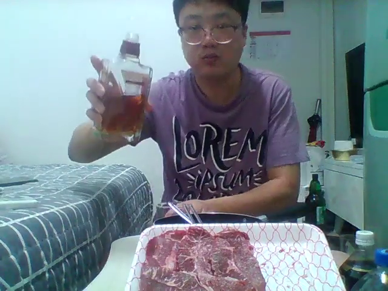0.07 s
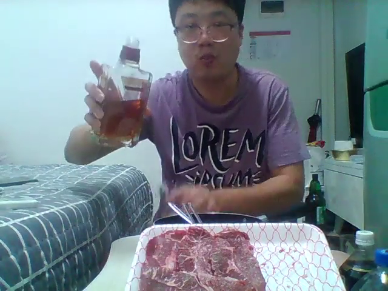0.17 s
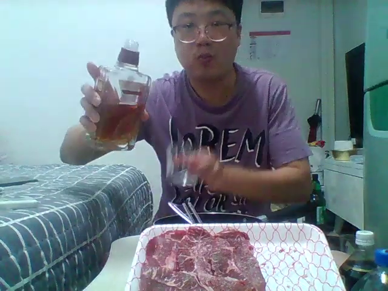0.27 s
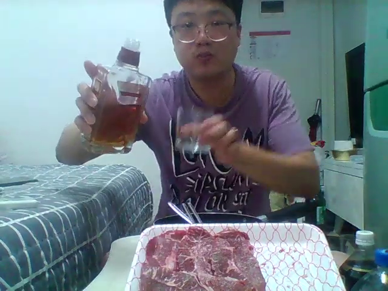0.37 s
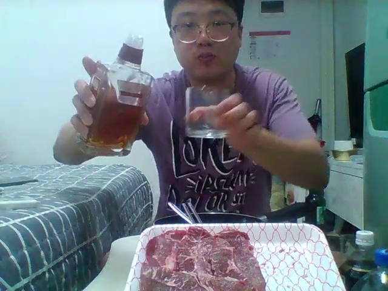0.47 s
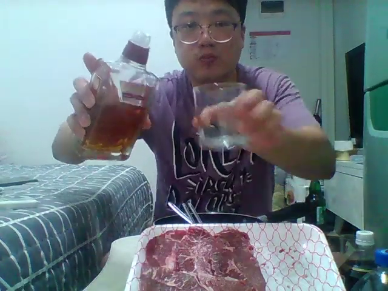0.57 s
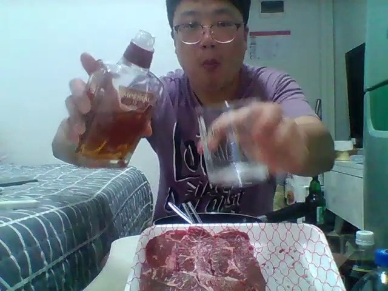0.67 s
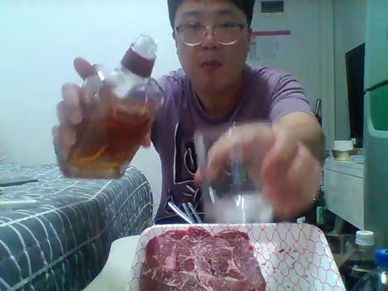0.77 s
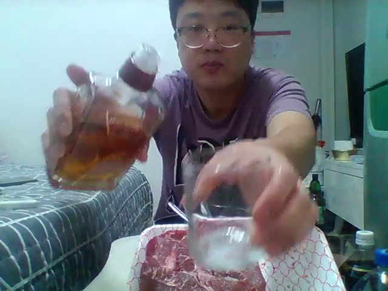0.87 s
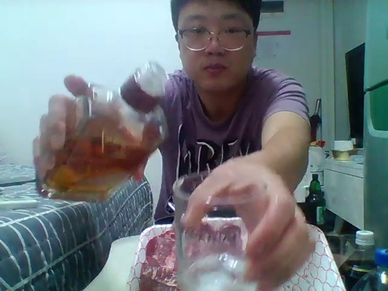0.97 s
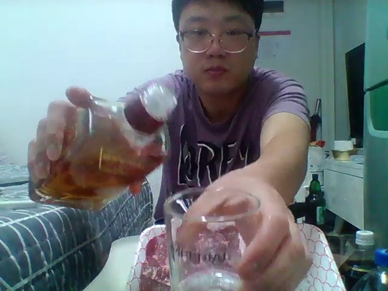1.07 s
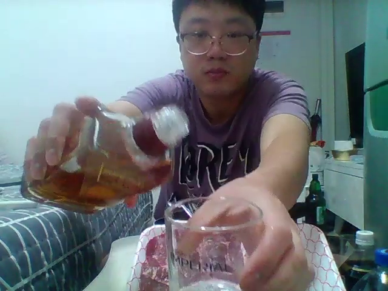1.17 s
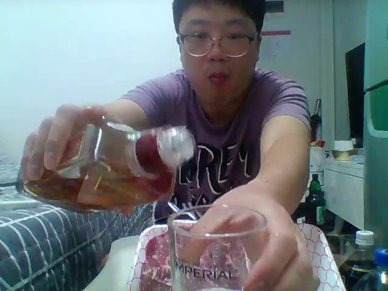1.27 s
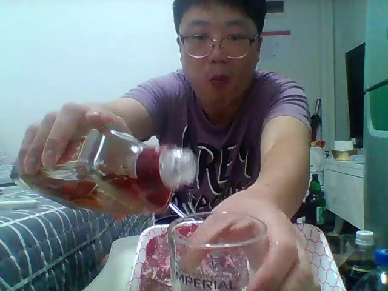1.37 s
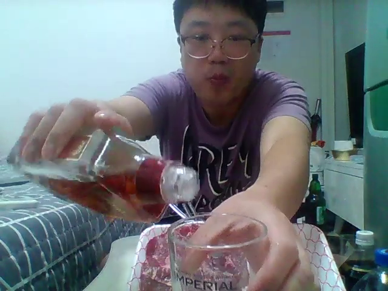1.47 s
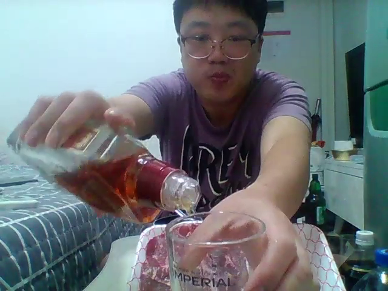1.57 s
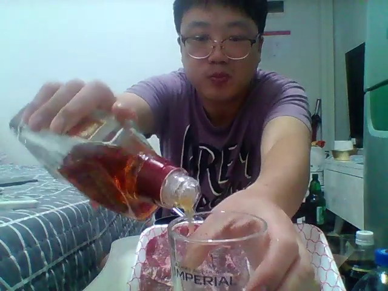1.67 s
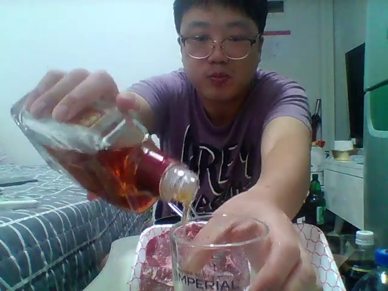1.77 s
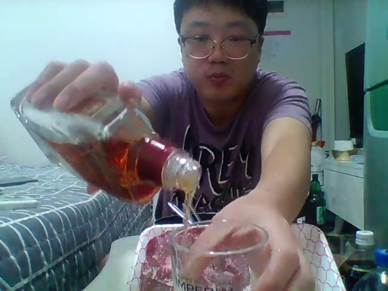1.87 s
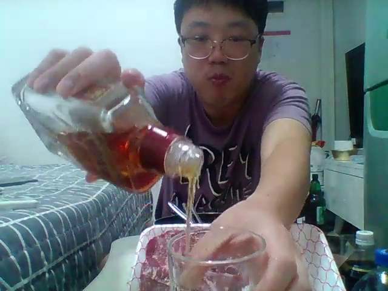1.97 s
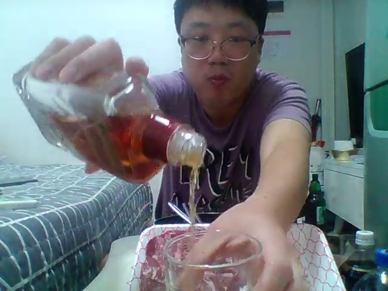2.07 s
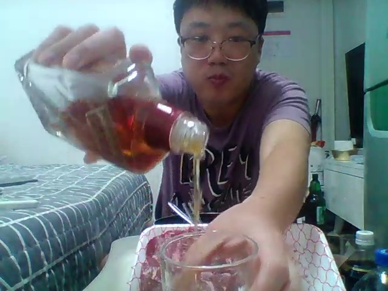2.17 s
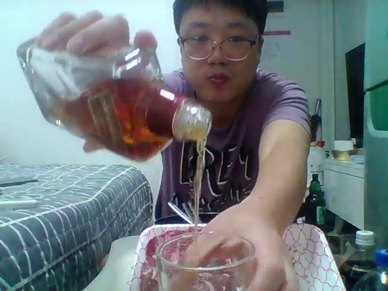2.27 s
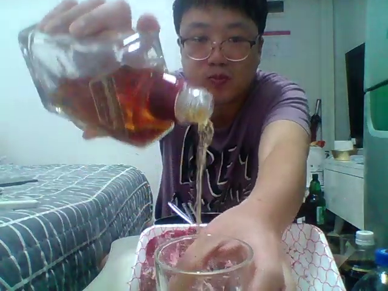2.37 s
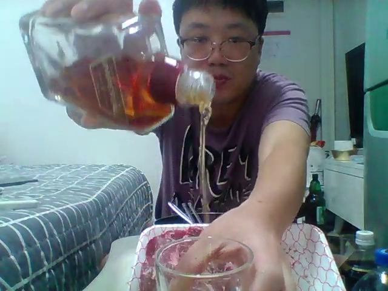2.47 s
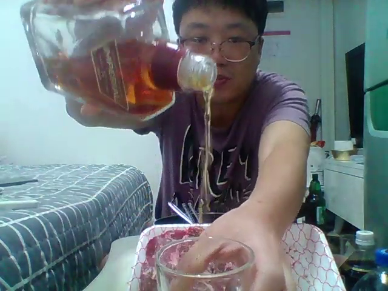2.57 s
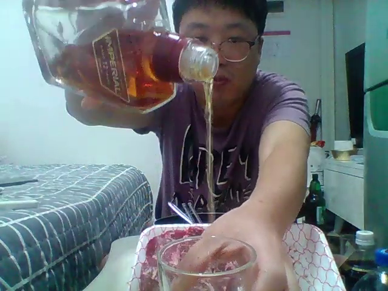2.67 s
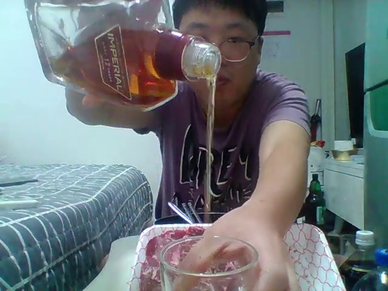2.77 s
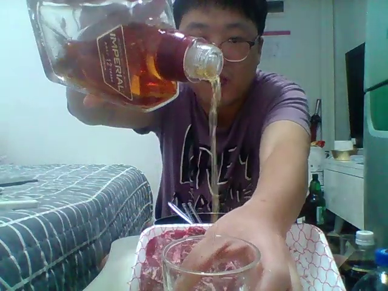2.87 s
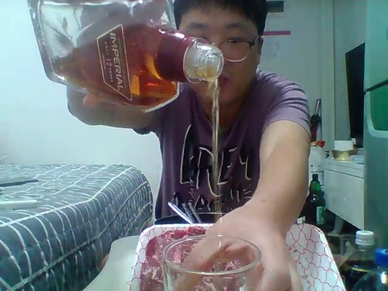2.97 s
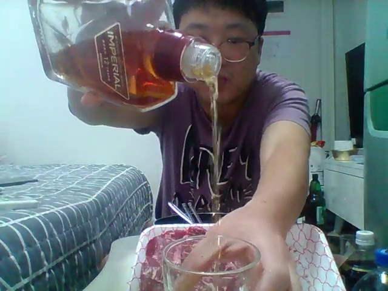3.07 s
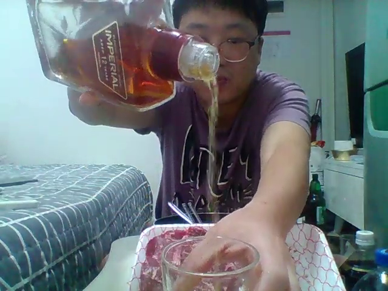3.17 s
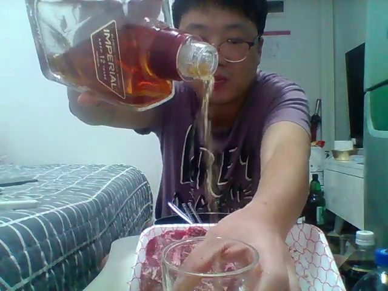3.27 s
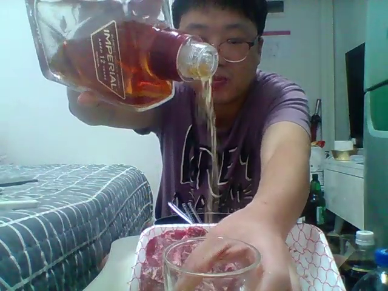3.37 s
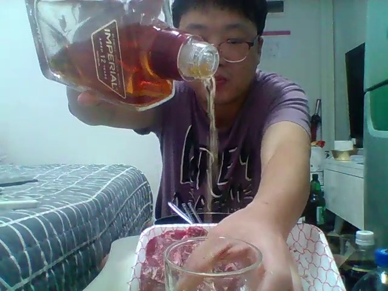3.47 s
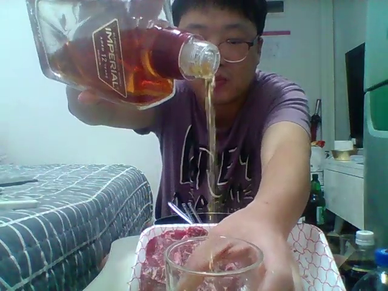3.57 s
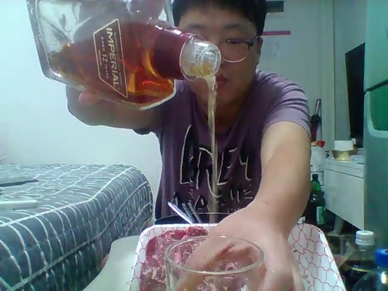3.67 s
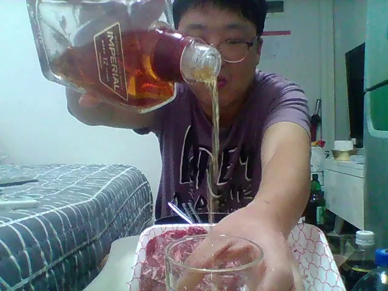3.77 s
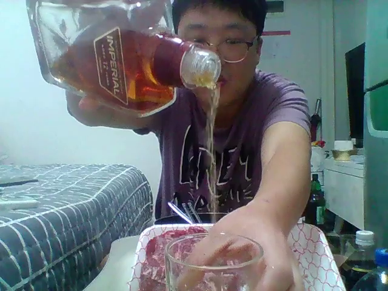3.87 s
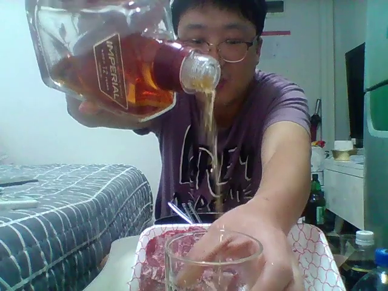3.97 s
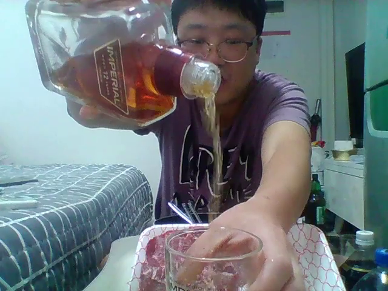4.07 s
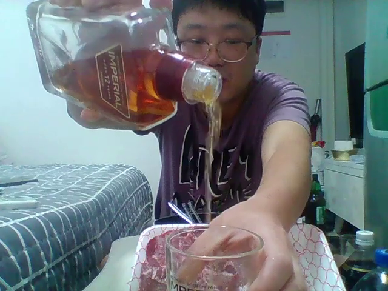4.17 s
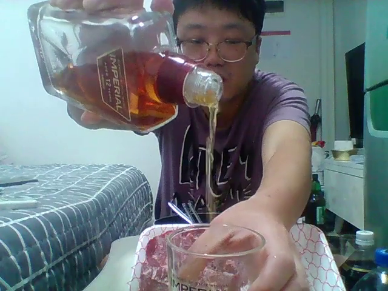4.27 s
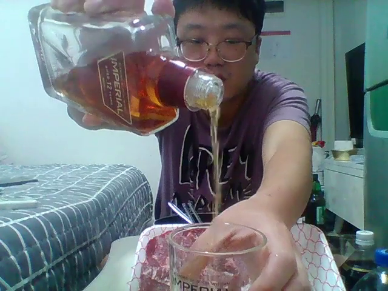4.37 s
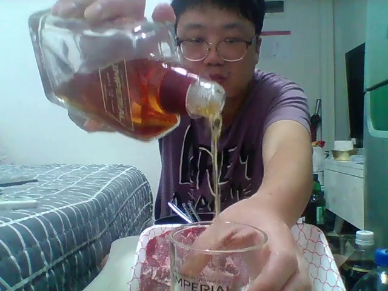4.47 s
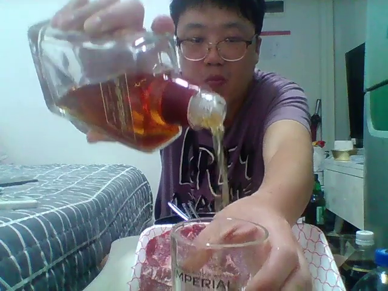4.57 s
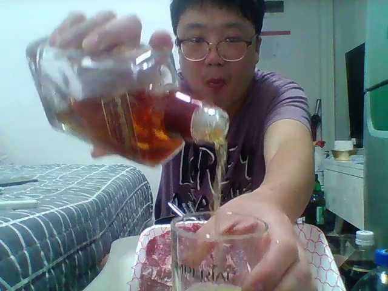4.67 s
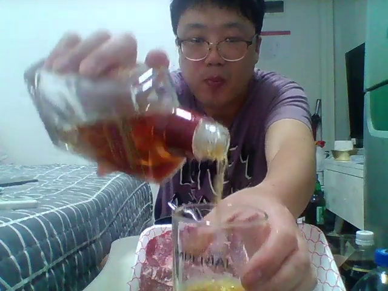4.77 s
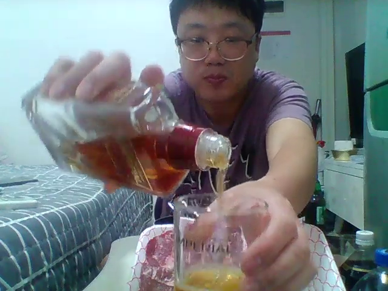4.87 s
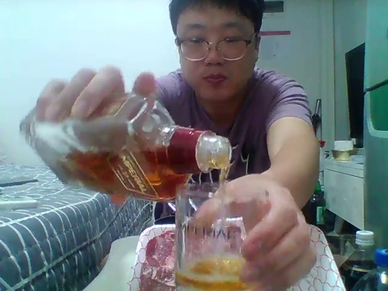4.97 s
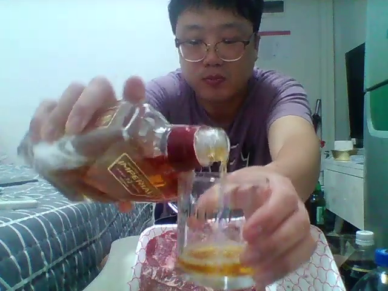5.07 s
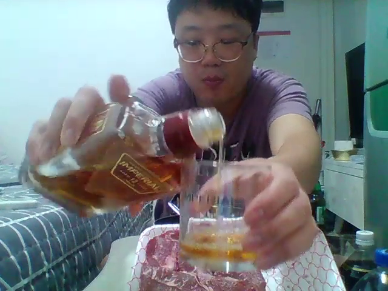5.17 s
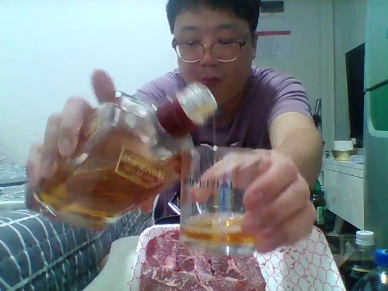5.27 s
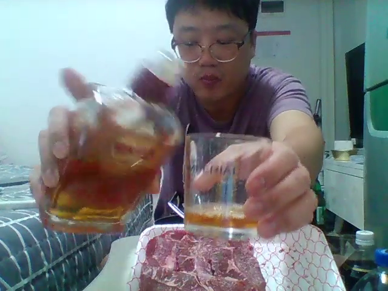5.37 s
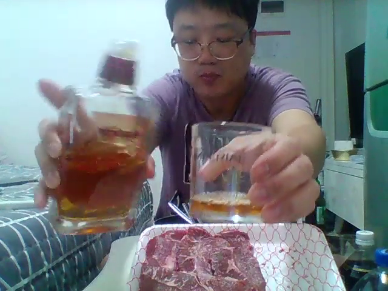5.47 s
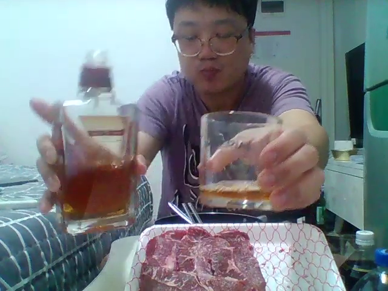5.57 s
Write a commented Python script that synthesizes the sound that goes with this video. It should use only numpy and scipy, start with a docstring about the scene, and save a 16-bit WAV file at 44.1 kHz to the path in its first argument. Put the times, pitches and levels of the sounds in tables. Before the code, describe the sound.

A steady hum and fan rush sit under soft rustles and thuds of glassware being handled. A bottle gulps air in small even blips, sparse at first, then the stream bubbles and patters inside a glass, growing fuller. One loud, short glass knock comes near the end, followed by wet plops and a light handling touch. Close, narrow-band microphone, short room reverberation.

```python
"""Whisky poured into a tumbler

Close up in a small room, whisky runs from a glass bottle into a hand-held tumbler while a computer hums.
Air gulps blip and ring the neck; bubbles, slaps and droplets are chirps and noise ringing the tumbler's air.
At the end the neck clinks on the rim as a set of decaying glass modes, after a few soft touches of handling.
A narrow-band microphone picks it all up and clips the loudest peaks."""
import sys
import numpy as np
from scipy import signal
from scipy.fft import rfft, irfft, next_fast_len
from scipy.io import wavfile
from scipy.ndimage import map_coordinates

SR = 44100
rng = np.random.default_rng(int(sys.argv[2]) if len(sys.argv) > 2 else 0)


def wrap_up_sound(samples):
    """Save the sound to the file named by the first command line argument, as 16-bit audio."""
    columns = np.atleast_2d(samples).T
    # keep every value between -1 and 1, then stretch to whole-number steps
    tamed = np.clip(columns, -1, 1)
    steps = np.round(tamed * 32767).astype(np.int16)
    wavfile.write(sys.argv[1], SR, steps)


N = 248327  # length in samples

# Steady tones of the computer and its fans. Each row: pitch in Hz, base level in dB rms.
HUM_TONES = [(58.5, -56.5), (90.2, -44), (119.2, -49), (327, -58), (368, -64.5), (490, -63), (653, -64.5),
             (818, -56.5), (981, -59)]
# Colour of the fan rush and microphone hiss. Each row: frequency in Hz, relative level in dB per Hz.
AIR_COLOUR = [(20, -0.5), (45, 3), (75, -2), (140, -3), (200, -12.5), (330, -10.5), (600, -11.5),
              (720, -15), (850, -8.5), (1050, -11.5), (1600, -19.5), (3000, -30), (5000, -31.5),
              (6600, -30.5)]
# How long the room rings. Each row: frequency in Hz, time to fall 60 dB in seconds.
ROOM_DECAY = [(150, .25), (1000, 0.24), (3000, 0.29), (7000, 0.2)]
# Hands shift on the glassware, arms brush the desk.
# Each row: start in seconds, rustle level in dB (before a common trim), thud level in dB.
TOUCHES = [(0.0094, -31.5, -38), (0.505, -30.5, -56), (0.694, -25, -29), (0.890, -28.5, -32),
           (1.1316, -24, -49), (1.3437, -35, -54), (5.453, -30, -53), (5.5889, -30.5, -46)]
# Colour of a rustle. Each row: frequency in Hz, relative level in dB.
RUSTLE_COLOUR = [(300, -19.5), (800, 0.5), (1500, 10.5), (2000, -5.5), (3200, -13), (7000, -44.5)]
# Colour of a thud. Each row: frequency in Hz, relative level in dB.
THUD_COLOUR = [(30, -5), (85, 6.5), (180, -1.5), (400, -5.5), (700, -16), (1500, -53)]
# Resonances of the bottle in the hand. Each row: centre in Hz, width in Hz, gain in dB.
BOTTLE_MODES = [(1017, 90, 7.5), (1480, 130, -4), (1930, 80, 10.5), (2880, 90, 7.5), (3850, 100, 13)]
# The neck strikes the rim and chatters.
# Each row: start in seconds, level in dB, extra level of the low body modes in dB against the rim ring.
CONTACTS = [(5.0578, 1.5, 1.5), (5.0952, -10.5, -6), (5.1235, -19, -10)]
# Ringing modes of bottle and tumbler. Each row: pitch in Hz, level in dB, time to fall 60 dB in seconds.
GLASS_MODES = [(902.7, -4.5, 0.084), (955.5, -10, 0.19), (1034, -17.5, 0.11), (1140, -25, 0.18),
               (1268, -28.5, 0.22), (1436, -25, 0.25), (1722, -25, .12), (2195, -2, 0.11),
               (2143, -27.5, 0.14), (2115, -34, 0.59), (2414, -22.5, 0.068), (3175, -26, 0.086),
               (4510, -38, 0.09), (5302, -33.5, 0.089), (5160, -34.5, 0.065), (6530, -34, 0.034)]
# Air resonances of the tumbler. Each row: centre in Hz, width in Hz, gain in dB.
CAVITY_MODES = [(963, 21, -3), (1364, 130, -2.5), (1690, 130, -13), (2090, 37, -6.5), (3080, 21, -15.5),
                (3362, 61, 0), (3800, 84, -9.5), (4565, 290, -3), (5400, 75, -4.5), (6080, 290, -4.5)]
# The loudest droplets that slap the glass.
# Each row: start in seconds, level in dB (before the trims of tick and ping), ping pitch in Hz.
DROPLETS = [(2.7324, -33.5, 3600), (3.104, -33, 2730), (3.1198, -32, 3280), (3.235, -35.5, 4440),
            (3.261, -38, 3270), (3.3014, -33.5, 3340), (3.3858, -37.5, 3290), (3.4341, -38, 3350),
            (3.482, -34, 3440), (3.6347, -36, 3190), (3.716, -37.5, 3320), (3.8402, -35.5, 3410),
            (3.8534, -24, 3570), (3.8916, -34, 3800), (3.918, -29, 3460), (3.9293, -28.5, 2980),
            (4, -33.5, 3260), (4.054, -22, 5730), (4.11, -36, 3430), (4.211, -39, 4540), (4.622, -34, 3470),
            (4.6754, -37, 3450), (4.89, -35, 3410)]
# Gushes that splash up in the glass. Each row: middle in seconds, level in dB.
GUSH_PEAKS = [(3.118, -45), (3.609, -45), (3.748, -48.5), (3.995, -43.5), (4.385, -45.5), (4.679, -45.5)]
# The stream in the glass as it swells and thins. Each row: time in seconds, churn level in dB, spray level in dB.
STREAM_LEVELS = [(2.8, -72.5, -70.5), (3.05, -56.5, -64.5), (3.3, -67, -63), (3.44, -58.5, -60.5),
                 (3.82, -51, -65.5), (4.06, -50, -57), (4.19, -63.5, -56), (4.35, -46, -65.5),
                 (4.84, -50.5, -62.5), (5.03, -51, -70.5), (5.23, -52, -71), (5.3, -63, -70)]
# The largest bubbles trapped by the stream.
# Each row: start in seconds, level in dB (before the mix of direct and tumbler sound), starting pitch in Hz,
# life in seconds.
BIG_BUBBLES = [(1.9712, -26, 1440, 0.026), (2.349, -31, 980, 0.011), (2.3528, -30, 1364, 0.015),
               (3.2925, -27.5, 1383, 0.027), (3.5909, -29, 1770, 0.015), (3.599, -24.5, 1380, 0.0097),
               (3.6948, -27, 1377, 0.015), (3.78, -31, 1314, 0.013), (3.853, -26, 945, 0.028),
               (3.894, -27, 1387, 0.025), (4.3046, -20.5, 1338, 0.021), (4.3598, -21.5, 1520, 0.011),
               (4.3989, -23, 1365, 0.014), (4.4358, -28.5, 1380, .018), (4.4992, -27.5, 990, 0.017),
               (4.509, -24, 1039, .022), (4.5494, -24, 957, .046), (4.5717, -29, 1370, 0.014),
               (4.5991, -29, 1043, 0.0345), (4.7002, -36, 1350, 0.023), (4.748, -34.5, 970, .04),
               (4.807, -30.5, 1505, 0.014), (4.8655, -32.5, 1316, 0.022), (4.8894, -27, 1360, 0.011),
               (4.9086, -32, 1360, 0.02), (4.9338, -28.5, 1270, 0.015), (5.0073, -33, 864, 0.035),
               (5.0223, -23, 934, .052), (5.1213, -14.5, 942, 0.019), (5.1242, -18.5, 1350, 0.014),
               (5.1444, -17.5, 980, 0.014), (5.1797, -23, 1007, 0.021), (5.1902, -27, 1380, 0.015),
               (5.2097, -18, 1052, 0.025), (5.2695, -27.5, 1366, 0.022)]
# Runs of air gulps in the bottle neck.
# Each row: start in seconds, number of gulps, blip peak of the first in dB, change from gulp to gulp in dB.
GULP_RUNS = [(1.4803, 5, -41, 2), (1.8287, 1, -43.5, 5), (1.8856, 2, -42, -1), (2.066, 3, -36, -2),
             (2.4514, 1, -31, 0), (2.5225, 6, -43.5, 0.5), (3.0929, 1, -32.5, -3), (3.2608, 1, -36.5, 0),
             (3.3887, 2, -33, -5), (3.7418, 1, -26.5, 0), (3.9739, 1, -32, 0), (4.1864, 2, -34, -9),
             (4.3635, 1, -27.5, 2.5), (4.5723, 1, -30.5, 0)]

# the low hum sinks for a while and returns
HUM_DIP_S, HUM_DIP_WIDTH_S, HUM_DIP_DB, HUM_LOW_DB = 3.04, 1.47, -6.5, 3
# a low rumble while the bottle is tipped
RUMBLE_START_S, RUMBLE_END_S, RUMBLE_FADE_S, RUMBLE_DB = 1.8, 3.88, .2, -54
GUSH_S = .05  # length of a gush
BUBBLE_RISE = 0.13  # share by which a big bubble's pitch climbs in one life
GULP_S = .0707  # the bottle takes in air at its own even pace
TOP_HZ = 15940  # nothing passes above this


def amp(db):
    """Decibels to gain."""
    return 10 ** (np.asarray(db) / 20)


def unit(x):
    """Scale to rms 1."""
    return x / np.sqrt(np.mean(x ** 2) + 1e-20)


def along(points, hz):
    """Read (Hz, value) points on a log frequency axis."""
    f, v = np.transpose(points)
    return np.interp(np.log(hz + 1), np.log(f + 1), v)


def clock(seconds):
    """Sample times of a stretch."""
    return np.arange(int(seconds * SR)) / SR


def add(track, s, sound):
    """Mix a sound into the track at time s."""
    part = track[max(round(s * SR), 0):][:len(sound)]
    part += sound[:len(part)]


def wobble(rate):
    """A smooth random curve, rate knots a second."""
    knots = rng.standard_normal(int(N * rate / SR) + 4)
    return map_coordinates(knots, [np.arange(N) * rate / SR])


def filtered(x, response):
    """Shape x by a complex response of frequency."""
    m = next_fast_len(len(x) + SR // 4)
    spectrum = rfft(x, m) * response(np.fft.rfftfreq(m, 1 / SR))
    return irfft(spectrum, m)[:len(x)]


def noise(colour, size=N):
    """Noise of rms 1 with the given colour."""
    return unit(filtered(rng.standard_normal(size), lambda hz: amp(along(colour, hz))))


def resonate(x, modes):
    """Let x ring a body, each mode a band-pass resonance (centre Hz, width Hz, dB)."""
    def response(f):
        return sum(amp(db) * 1j * f * w / (c * c - f * f + 1j * f * w) for c, w, db in modes)
    return filtered(x, response)


def tumbler(x):
    """The air in the tumbler rings at its own resonances."""
    return resonate(x, CAVITY_MODES)


def bubble(hz, life, rise, onset=5, fade_db=40):
    """A pocket of air rings, peak about 1; its pitch climbs as it nears the surface."""
    t = clock(2 * life)
    swell = (1 - np.exp(-onset * t / life)) * amp(-fade_db * t / life)
    chirp = np.sin(2 * np.pi * hz * t * (1 + rise * t / life / 2))
    return swell / swell.max() * chirp


def swarm(count, centre_hz, spread, cycles, scatter_db, direct):
    """Many small bubbles of random pitch, size and life, heard direct and in the tumbler; pour rms about 1."""
    out, start, end = np.zeros(N), STREAM_LEVELS[0][0], STREAM_LEVELS[-1][0]
    times = start + (end - start) * (np.arange(count) + 2 * rng.random(count)) / count
    for s, (pitch, size, life) in zip(times, np.clip(rng.standard_normal((count, 3)), -2, 2)):
        hz = centre_hz * np.exp(spread * pitch)
        add(out, s, amp(scatter_db * size) * bubble(hz, cycles * np.exp(.5 * life) / hz, 0.036))
    return unit(direct * out + tumbler(out)) * np.sqrt((end - start) * SR / N)


def computer(air_db=-46, waver_db=0.66, drift=0.13, low_hz=100):
    """Tones wavering in level and phase over fan rush and microphone hiss."""
    t = np.arange(N) / SR
    low_swell = HUM_LOW_DB + HUM_DIP_DB * np.exp(-((t - HUM_DIP_S) / HUM_DIP_WIDTH_S) ** 2)
    tones = np.zeros(N)
    for hz, db in HUM_TONES:
        phase = 2 * np.pi * (hz * t + rng.random())
        phase += drift * np.sqrt(hz / HUM_TONES[0][0]) * wobble(5)
        tones += amp(db + low_swell * (hz < low_hz) + waver_db * wobble(2)) * np.sin(phase)
    return np.sqrt(2) * tones + amp(air_db) * noise(AIR_COLOUR)  # sqrt(2) turns peak into rms


def wall(x, delay=.0165):
    """One early echo from the nearest wall, delay in seconds."""
    return np.pad(x, (int(delay * SR), 0))[:N]


def room(x, delay=.008):
    """The small room answers with a noise tail; each frequency dies at its own speed."""
    hz, t, z = signal.stft(rng.standard_normal(SR // 2), SR, nperseg=256)
    decay = amp(-60 * t / along(ROOM_DECAY, hz)[:, None])
    tail = signal.istft(z * decay, SR, nperseg=256)[1]
    delayed = np.pad(tail / np.linalg.norm(tail), (int(delay * SR), 0))
    return signal.fftconvolve(x, delayed)[:N]


def handling(rustle_db=-10, rustle_t60=0.047, thud_t60=0.1):
    """Soft touches: a brief rustle that rings the bottle, over a dull thud."""
    rustles, thuds, t = np.zeros(N), np.zeros(N), clock(0.14)
    soft = 1 - np.exp(-t / 0.00094)
    for s, high_db, low_db in TOUCHES:
        rustle = noise(RUSTLE_COLOUR, size=len(t))
        add(rustles, s, soft * amp(high_db + rustle_db - 60 * t / rustle_t60) * rustle)
        thud = noise(THUD_COLOUR, size=len(t))
        add(thuds, s, soft * amp(low_db - 60 * t / thud_t60) * thud)
    return .5 * rustles + resonate(rustles, BOTTLE_MODES) + thuds


def rumble():
    """Low coloured noise fades in as the liquid starts to run, holds and fades out."""
    t = np.arange(N) / SR
    swell = np.clip(np.minimum(t - RUMBLE_START_S, RUMBLE_END_S - t) / RUMBLE_FADE_S, 0, 1)
    colour = [(90, -31.0), (140, 0.5), (185, -1.5), (260, -11.5), (600, -27.5), (1200, -55)]
    return amp(RUMBLE_DB) * swell * noise(colour)


def clink(attack=0.0021, body_top_hz=1900, crack_db=-17, crack_t60=0.088, choke_s=5.15, choke_db=-6):
    """Glass on glass: each contact feeds the same ringing modes and makes a short crack."""
    out, t = np.zeros(N), clock(.55)
    colour = [(100, -14.5), (400, -7.0), (900, 11.5), (1550, 1), (2300, 8.5), (4000, -23.0), (7000, -26.0)]
    for s, db, body_db in CONTACTS:
        since_first = t + s - CONTACTS[0][0]  # keeps each mode in step across the contacts
        for hz, mode_db, t60 in GLASS_MODES:
            level_db = db + mode_db + body_db * (hz < body_top_hz)
            swell = (1 - np.exp(-t / attack)) * amp(level_db - 60 * t / t60)
            add(out, s, swell * np.sin(2 * np.pi * hz * since_first))
        crack = noise(colour, size=len(t))
        add(out, s, amp(db + crack_db - 60 * t / crack_t60) * crack)
    # the neck comes to rest on the rim and damps the ring
    choke = np.clip((np.arange(N) / SR - choke_s) / 0.0091, 0, 1)
    return out * amp(choke_db * choke)


def drops(ping_db=-6, life=0.0096, slap_db=-7, slap_t60=0.014):
    """A droplet makes a wet tick and a tiny ping, both sounding the tumbler."""
    out, t = np.zeros(N), clock(.04)
    colour = [(700, -15.0), (1700, 10.0), (2600, 2.0), (4000, 2.5), (7000, -4.5)]
    for s, db, hz in DROPLETS:
        slap = noise(colour, size=len(t))
        add(out, s, amp(db + slap_db - 60 * t / slap_t60) * slap)
        add(out, s, amp(db + ping_db) * bubble(hz, life, 0.021))
    return .5 * out + tumbler(out)


def gushes():
    """A thicker part of the stream lands: a short, dense burst of small bubbles."""
    t = np.arange(N) / SR
    swell = np.zeros(N)
    for s, db in GUSH_PEAKS:
        swell += amp(db) * np.cos(np.pi * np.clip((t - s) / GUSH_S, -.5, .5)) ** 2
    return swell * swarm(count=1800, centre_hz=2316, spread=0.18, cycles=10, scatter_db=2, direct=0.86)


def stream(gurgle_db=-1, surge_db=4.0):
    """The surging stream churns the liquid, traps gurgling bubbles and throws up a fine spray."""
    def level(s, db):
        return amp(np.interp(np.arange(N) / SR, s, db, left=-120, right=-120))
    s, churn_db, spray_db = np.transpose(STREAM_LEVELS)
    gurgle = swarm(count=260, centre_hz=1217, spread=0.2, cycles=17, scatter_db=2.0, direct=0.9)
    churn = swarm(count=800, centre_hz=1692, spread=0.303, cycles=9.8, scatter_db=6, direct=0.23)
    spray = swarm(count=1000, centre_hz=4310, spread=0.31, cycles=6.5, scatter_db=7.5, direct=.22)
    splash = level(s, churn_db) * (churn + amp(gurgle_db) * gurgle) + level(s, spray_db) * spray
    return splash * amp(surge_db * wobble(35))


def plops(direct_db=-1, cavity_db=-11, slap_db=-8.5, slap_t60=0.065):
    """Each large bubble is born in a wet slap; both sound the tumbler."""
    tones, slaps, t = np.zeros(N), np.zeros(N), clock(0.051)
    colour = [(500, -19.5), (900, 13), (2000, 3.5), (2900, -17.5), (5000, -32)]
    for s, db, hz, life in BIG_BUBBLES:
        add(tones, s, amp(db) * bubble(hz, life, BUBBLE_RISE))
        slap = noise(colour, size=len(t))
        add(slaps, s, amp(db + slap_db - 60 * t / slap_t60) * slap)
    direct = amp(direct_db) * tones + .5 * slaps
    return direct + tumbler(amp(cavity_db) * tones + slaps)


def glugs(blip_hz=1930, life=0.0063, rise=0.17, ring_db=-11, ring_hz=2085, ring_t60=0.12,
          smack_db=-12, smack_t60=0.023):
    """Each gulp of air is a wet smack and a short upward blip that leaves the neck ringing."""
    out, t = np.zeros(N), clock(.15)
    colour = [(400, -19.5), (900, 6.5), (2300, -3), (3200, -21)]
    gulps = []
    for s, count, db, step_db in GULP_RUNS:
        gulps += [(s + k * GULP_S, db + k * step_db) for k in range(round(count))]
    for (s, db), (pitch, phase) in zip(gulps, rng.standard_normal((len(gulps), 2))):
        add(out, s, amp(db) * bubble(blip_hz * np.exp(.025 * pitch), life, rise))
        ring = np.sin(2 * np.pi * ring_hz * np.exp(.006 * pitch) * t + np.pi * phase)
        add(out, s, amp(db + ring_db - 60 * t / ring_t60) * (1 - np.exp(-t / 0.0012)) * ring)
        smack = noise(colour, size=len(t))
        add(out, s, amp(db + smack_db - 60 * t / smack_t60) * smack)
    return out


def scene(pour_room_db=-12, clink_room_db=-19, wall_db=-14):
    """The pour and the clink in the room, over the hum."""
    pour = glugs() + plops() + drops() + stream() + gushes() + rumble() + handling()
    glass = clink()
    echo = amp(wall_db) * wall(pour)
    reverb = room(amp(pour_room_db) * pour + amp(clink_room_db) * glass)
    return (pour + glass + echo + reverb + computer())[None]


def record(dry, band_hz=6900):
    """A narrow-band microphone whose signal clips on the loudest peaks, then a sharp top cut."""
    narrow = filtered(dry[0], lambda hz: 1 / np.sqrt(1 + (hz / band_hz) ** 90))
    clipped = np.clip(narrow, -.81, .81)
    return filtered(clipped, lambda hz: hz < TOP_HZ)[None]


dry = scene()
out = record(dry)
wrap_up_sound(out)
```